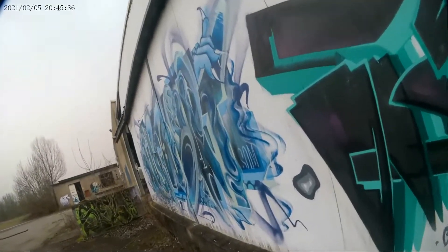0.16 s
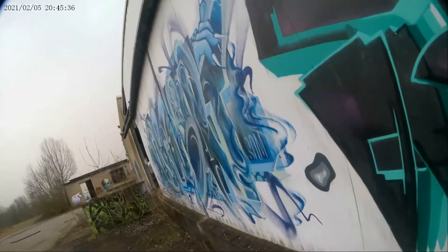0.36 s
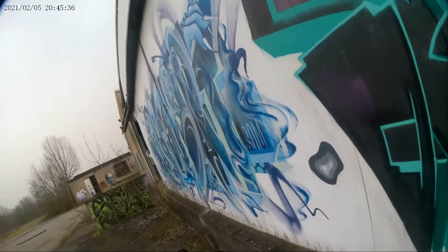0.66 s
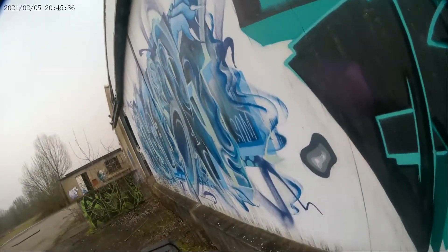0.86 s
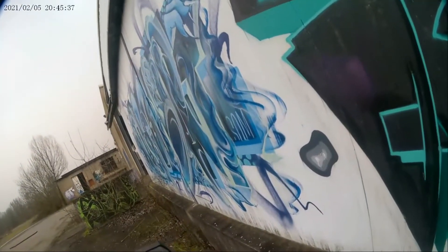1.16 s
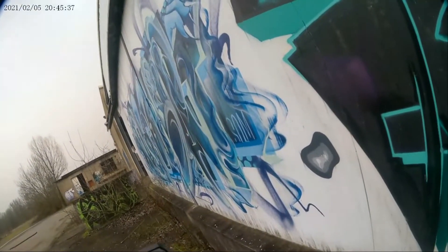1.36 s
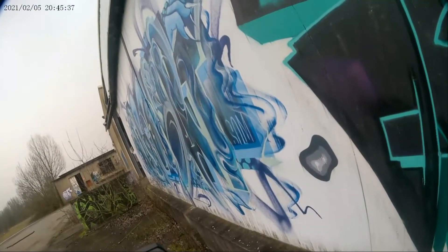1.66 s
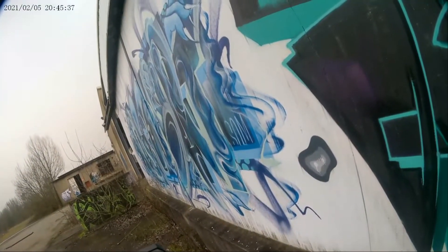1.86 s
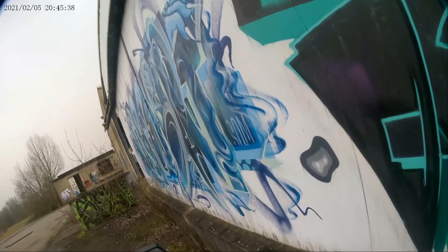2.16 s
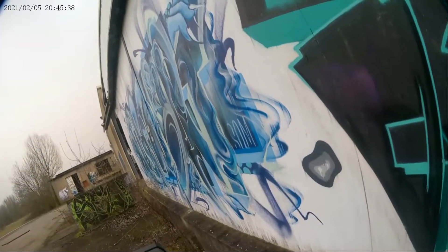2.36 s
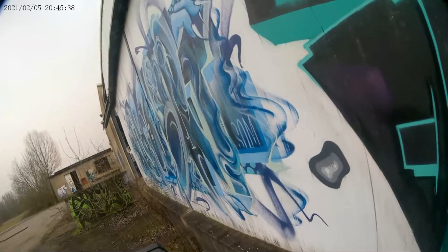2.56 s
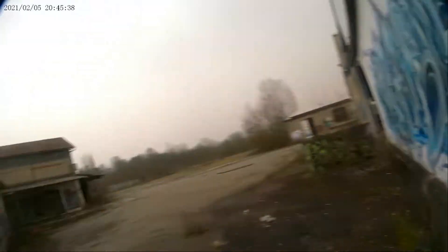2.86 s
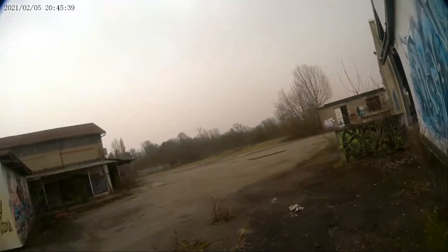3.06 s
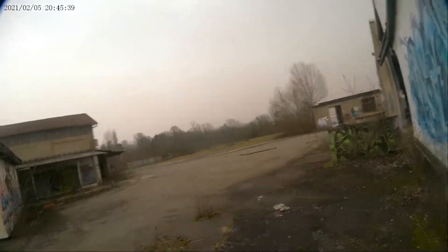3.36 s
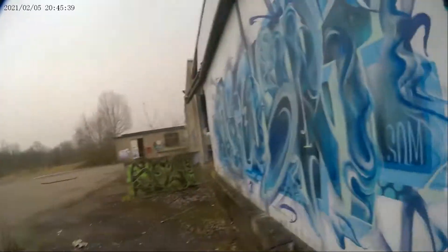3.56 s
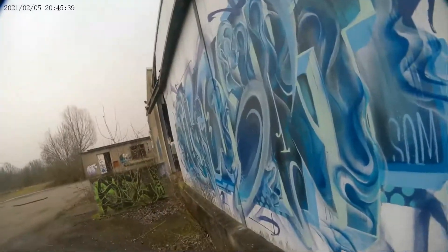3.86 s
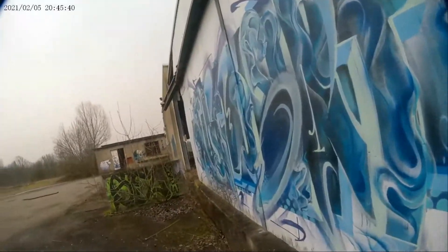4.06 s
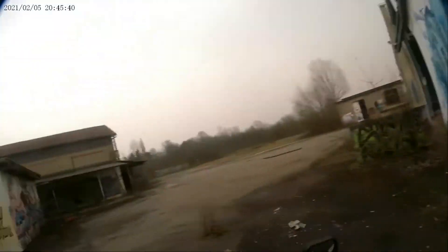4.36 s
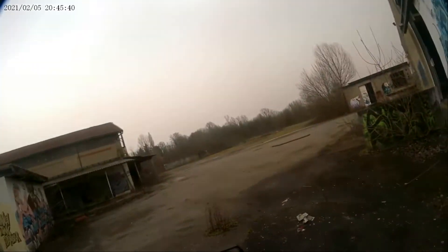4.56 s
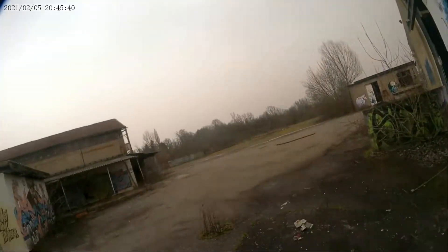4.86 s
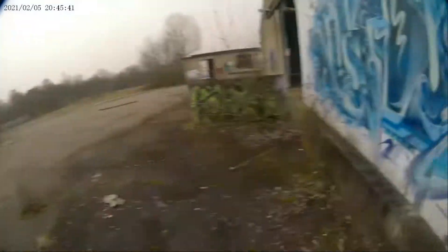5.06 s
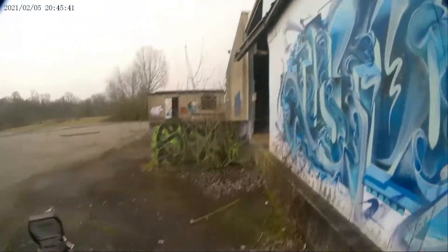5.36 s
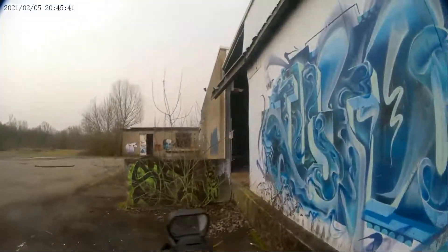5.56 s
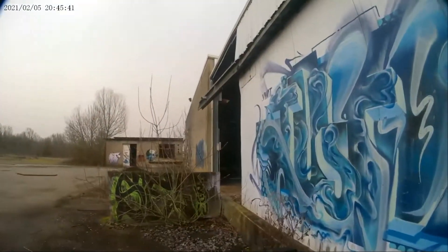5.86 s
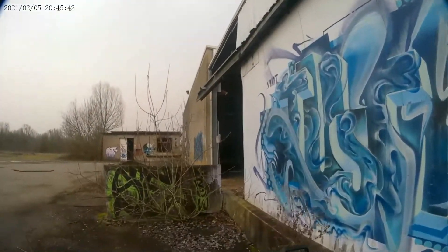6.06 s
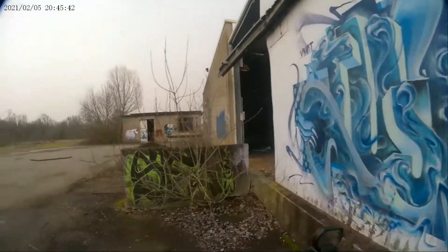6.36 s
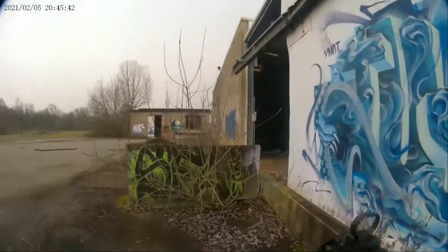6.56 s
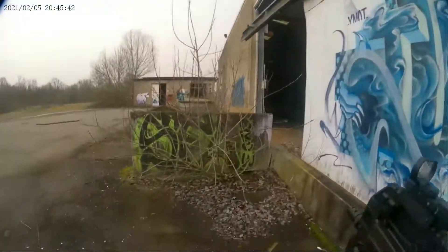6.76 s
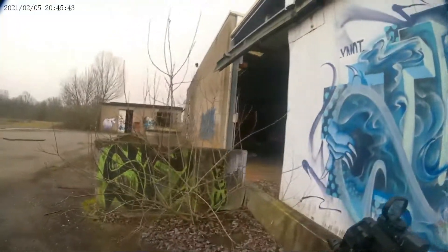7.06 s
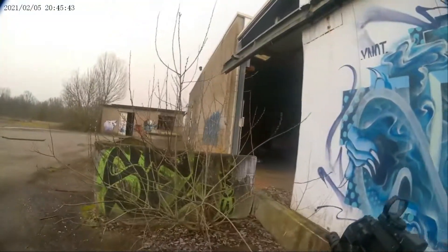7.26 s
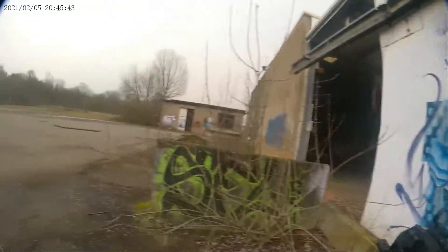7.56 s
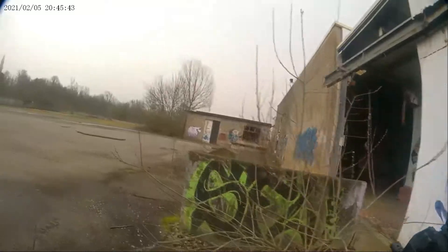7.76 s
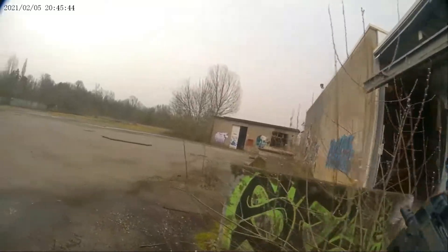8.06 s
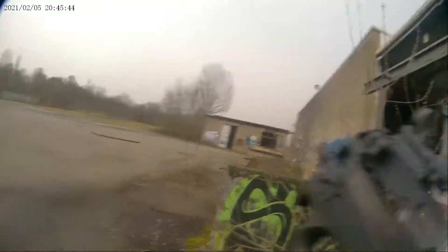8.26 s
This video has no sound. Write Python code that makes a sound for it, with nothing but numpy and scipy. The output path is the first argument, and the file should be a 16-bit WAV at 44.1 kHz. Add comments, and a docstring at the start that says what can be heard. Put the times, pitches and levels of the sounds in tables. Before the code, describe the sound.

Helmet camera outdoors: faint hiss and wind rumble, then irregular plastic knocks, clacks and rattles as the wearer moves over grit, with distant bird trills.

```python
"""A walker on gravel, heard through a small camera fixed to a helmet. From the start there is hiss with a thin
whine, a low wind rumble, and a rustle made of many tiny contacts. Soon jolts of the mount ring the plastic shell
as soft knocks, harder clacks and sharp ticks; swarms of tiny contacts make short rubs and rumbles, and lone stones
tick. Then far birds trill in short sliding notes, and the camera starts to slap in its seat: the seat rings and the
microphone is shoved. Later head swings stir up gusts of wind, and one low coo is heard among the trills."""
import sys
import numpy as np
from scipy import signal
from scipy.fft import rfft, irfft
from scipy.io import wavfile
from scipy.ndimage import uniform_filter1d

SR = 44100
rng = np.random.default_rng(int(sys.argv[2]) if len(sys.argv) > 2 else 0)


def master_out(mix):
    """Clip the mix to full scale and print it as 16-bit PCM to the path in sys.argv[1]."""
    frames = np.transpose(np.atleast_2d(mix))
    ceiling = np.clip(frames, -1, 1)
    pcm = np.round(ceiling * 32767).astype(np.int16)
    wavfile.write(sys.argv[1], SR, pcm)


def convert_level_to_amplitude(level_db):
    """Map a level in decibels to its linear amplitude factor."""
    exponent = np.asarray(level_db, float) / 20
    return 10 ** exponent


N = 370966  # samples in the scene
SPAN = 5000  # samples kept of each ringing contact

# Ways the plastic shell can ring: (f/Hz, relative strength/dB, time to fall 60 dB/s; 0.002 s at least is used)
SHELL = [(65.2, -29.5, 0.12), (130.5, 5.5, 0.028), (229.4, -1, 0.036), (370, -40.5, 0.011),
         (472, 19, 0.013), (550.5, 19, 0.044), (658.5, 6, 0.093), (748.2, 21, 0.035), (899, 22.5, 0.036),
         (1337, 29, 0.0076), (1443, 18.5, 0.0079), (1800, 15, 0.0072), (2320, 11, 0.028),
         (2990, 12.5, 0.002), (3520, -1.5, 0.0067), (3892, -8, 0.022), (5100, -2.5, 0.0069),
         (5510, 0, 0.0035), (7420, 10, 0.001), (8250, -11.5, 0.0071), (10540, -6.5, 0.0025),
         (12000, -4, 0.0046)]
# The mount strikes the helmet: (t/s, low knock level/dB, middle clack level/dB, high tick level/dB)
JOLTS = [(.148, -25, -31, -53), (.158, -30.5, -38, -68), (.1705, -31, -47, -50), (0.2319, -41, -33, -38),
         (0.2369, -41, -33.5, -43), (0.2942, -32, -32, -59), (0.385, -39, -39, -50),
         (0.4264, -46, -39, -49), (2.72, -30, -37, -48), (2.726, -37.5, -48, -65), (2.876, -31.5, -49, -53),
         (2.885, -38, -39, -51), (2.936, -16.5, -19.5, -30.5), (2.967, -36, -42, -59),
         (3.4008, -16, -17.5, -27), (3.42, -28.5, -52, -70), (3.4665, -26.5, -34, -65),
         (3.605, -7, -22, -22), (3.643, -26.5, -46, -48), (4.127, -44, -66, -68), (4.1738, -27.5, -31, -48),
         (4.376, -37, -46, -51), (4.389, -29.5, -38, -52), (4.423, -9, -13.5, -25.5),
         (4.5086, -39, -35.5, -62), (4.623, -26, -32, -47), (4.628, -32.5, -39, -60),
         (4.646, -54, -45, -63), (4.812, -38, -39.5, -68), (4.9681, -18.5, -15.5, -28.5),
         (5.055, -32, -46, -63), (5.111, -17, -20.5, -23), (5.151, -38, -42, -47), (5.23, -40, -50, -68),
         (5.287, -46, -49, -69), (5.355, -44, -55, -67), (5.458, -37, -40.5, -72), (5.581, -36, -36.5, -49),
         (5.6428, -36.5, -44, -69), (5.6755, -37.5, -49, -65), (5.716, -21, -22, -34),
         (5.737, -53, -38, -46), (6.298, -24, -35, -54), (6.321, -20.5, -24, -36), (6.351, -33, -34.5, -59),
         (6.5074, -32, -34, -52), (6.6324, -37, -51, -58), (6.6651, -27, -27, -66),
         (6.761, -20.5, -20, -30), (6.7955, -45, -44, -56), (6.853, -37, -55, -66),
         (6.884, -23.5, -20.5, -33), (6.89, -20.5, -35, -45), (7.008, -41.5, -46, -62),
         (7.4306, -34, -36.5, -56), (7.522, -25, -19.5, -44), (7.5475, -33, -45, -59),
         (7.6135, -20.5, -26, -42.5), (7.682, -43.5, -56, -67), (7.845, -32, -32, -45),
         (7.893, -35, -40, -55), (7.989, -34, -35.5, -54), (8.272, -38.5, -47, -61), (8.297, -37, -50, -54),
         (8.347, -40, -56, -62), (8.3886, -17.5, -28, -63)]
# The camera slaps in its seat, often just after a jolt:
# (t/s, shove level/dB, high tick level/dB, low knock level/dB, direction: 1 out, -1 in)
SLAPS = [(2.7974, -26, -21.5, -35.5, 1), (2.8006, -40, -29, -50, 1), (2.9464, -34, -37, -42, -1),
         (2.9523, -25, -30, -26, 1), (3.1248, -38, -39, -40.5, 1), (3.4081, -29.5, -33, -16, -1),
         (3.611, -14, -20, -7, -1), (3.6188, -28, -22, -22, 1), (3.625, -30, -42, -25, 1),
         (4.4387, -20, -47, -29, -1), (4.4416, -44, -28, -29, -1), (4.4573, -43, -46, -18, 1),
         (4.9748, -32.5, -38, -19, 1), (5.0653, -35.5, -40.5, -37, 1), (5.1146, -17, -26.5, -6, -1),
         (5.1247, -26, -27.5, -38, 1), (5.127, -44, -37, -37, -1), (5.7311, -25.5, -41, -27.5, -1),
         (6.1412, -29.5, -40.5, -31, -1), (6.236, -40.5, -39, -44, 1), (6.5254, -31, -41, -43, -1),
         (6.7718, -22, -40, -32, -1), (6.826, -52, -49, -46.5, 1), (6.8981, -26.5, -51, -37, -1),
         (6.94, -57, -50, -59, -1), (7.0531, -43.5, -42, -71, 1), (7.1829, -31.5, -41, -46, -1),
         (7.1925, -35.5, -54, -38, -1), (7.3156, -39, -39.5, -49, 1), (7.4483, -30.5, -44.5, -37, -1),
         (7.487, -52, -45.5, -42.5, 1), (7.536, -31, -65, -26.5, -1), (7.6272, -24.5, -39, -29, -1),
         (7.8583, -31.5, -45.5, -30.5, -1), (8.4062, -40, -37, -38.5, 1)]

SCATTER_DB = 2.2  # how much the mix of modes varies from one contact to the next
DAMP_S = 0.0023  # extra deadening of stone ticks, rubs and rumbles: time to fall to 1/e


def level(x, db):
    """Scale a sound to an rms level: the root of its mean power."""
    return x * convert_level_to_amplitude(db) / np.sqrt(np.mean(x ** 2))


def walk(per_s):
    """A wandering level: random values held 1 / per_s seconds, then smoothed twice."""
    hold = int(SR / per_s)
    steps = np.repeat(rng.standard_normal(N // hold + 1), hold)
    smooth = uniform_filter1d(uniform_filter1d(steps, hold), hold)
    return 1.3 * smooth[:N]


def arch(start, length):
    """A half-sine swell from 0 to 1 and back, zero elsewhere."""
    t = np.arange(N) / SR
    return np.sin(np.pi * np.clip((t - start) / length, 0, 1))


def rings(body, centre_hz, octaves, push_s, chatter_s, rough, scatter_db):
    """A body's ring after each contact, peak 1: a contact wakes the modes near its centre."""
    hz, db, t60 = np.array(body).T[:, :, None]
    t = np.arange(SPAN) / SR
    modes = np.sin(2 * np.pi * hz * t) * np.exp(-np.log(1000) * t / np.maximum(t60, 0.002))
    distance = np.log2(hz.T / np.reshape(centre_hz, (-1, 1))) / octaves
    # one set of random numbers per contact: first for its modes, then for its chatter
    chance = rng.standard_normal((len(distance), len(body) + 600))
    weight = convert_level_to_amplitude(db.T + scatter_db * chance[:, :len(body)]) * np.exp(-distance ** 2)
    weight = weight * (-1) ** np.arange(len(body))  # neighbouring modes start in opposite directions
    # a smooth push (longer = softer), roughened by a dying chatter of tiny contacts
    push = np.sin(np.pi * np.clip((t[:600] + 0.5 / SR) / push_s, 0, 1)) ** 2
    chatter = chance[:, len(body):] * np.exp(-t[:600] / chatter_s) / np.sqrt(2 * chatter_s / push_s)
    smooth_chatter = signal.fftconvolve(rough * chatter, push[None] / np.linalg.norm(push), axes=1)
    force = push + smooth_chatter[:, :600]
    out = signal.fftconvolve(weight @ modes, force, axes=1)[:, :SPAN]
    return out / np.abs(out).max(axis=1, keepdims=True)


def place(times, db, sounds):
    """Lay each sound down at its time and level."""
    out = np.zeros(N + SPAN)
    for start, gain, sound in zip((times * SR).astype(int), convert_level_to_amplitude(db), sounds):
        out[start:start + SPAN] += gain * sound
    return out[:N]


def trail(times, db, t60):
    """Power that jumps at each time and dies away, falling 60 dB in t60 seconds."""
    kicks = np.zeros(N)
    np.add.at(kicks, np.minimum((times * SR).astype(int), N - 1), convert_level_to_amplitude(2 * db))
    return signal.lfilter([1], [1, -convert_level_to_amplitude(-2 * 60 / (t60 * SR))], kicks)


def power_db(*powers):
    """Level of unrelated sounds together: their powers add."""
    return 10 * np.log10(sum(powers))


def all_knocks():
    """Times and levels of the low knocks: a little after each jolt, a little before each slap."""
    jolt, slap = np.transpose(JOLTS), np.transpose(SLAPS)
    times = np.r_[jolt[0] + 0.00154, slap[0] - 0.001]
    return times, np.r_[jolt[1], slap[3]]


def air():
    """Still air and microphone hiss: shaped noise with a faint, narrow electronic whine."""
    # Shape of the steady noise: (f/Hz, relative level per Hz/dB)
    air_shape = [(59, -37), (100, -26.5), (156, -23), (181, 1), (249, -1.5), (315, -8), (736, -10),
                 (1580, -23), (3940, -26), (10000, -28), (16000, -28)]
    whine_hz, whine_width_hz, whine_db = 9930, 70, 0  # whine level is against the hiss around it
    top_hz, air_db = 15900, -65
    hz = np.fft.rfftfreq(N, 1 / SR) + 1
    shape_hz, shape_db = np.transpose(air_shape)
    shape = convert_level_to_amplitude(np.interp(np.log(hz), np.log(shape_hz), shape_db))
    shape = shape * (1 + convert_level_to_amplitude(whine_db) * np.exp(-((hz - whine_hz) / whine_width_hz) ** 2))
    noise = irfft(rfft(rng.standard_normal(N)) * shape * (hz < top_hz), N)
    return level(noise, air_db)


def wind(effort_db):
    """Slow pressure swirls on the microphone port, stronger as the walker, mount and head move."""
    # The head swings through the air: (start t/s, length/s, level/dB)
    gusts = [(5.7, 0.095, -36), (4.5, 0.18, -46), (6.9, 0.35, -47), (7.75, .3, -47)]
    still_db, stir_db = -59, -2.5  # still wind; air stirred by moving, against the cloth
    sway_db, sway_growth, sway_t60_s = -25, 0.87, 0.42  # the mount sways through the air after a shove
    shove_s, shove_db = np.transpose(SLAPS)[:2]
    sway = trail(shove_s, sway_db + sway_growth * shove_db, sway_t60_s)
    swings = sum(convert_level_to_amplitude(2 * db) * arch(start, length) ** 2 for start, length, db in gusts)
    wind_db = power_db(convert_level_to_amplitude(2 * still_db), convert_level_to_amplitude(2 * (effort_db + stir_db)), sway, swings)
    band = signal.butter(2, [18, 90], "bandpass", fs=SR, output="sos")
    rumble = level(signal.sosfilt(band, rng.standard_normal(N)), 0)
    return rumble * convert_level_to_amplitude(wind_db + 0.28 * walk(12))


def rustle(effort_db, grit_db):
    """Dense small contacts: cloth rubs the low modes, grit the high ones."""
    shake_db, shake_growth, shake_t60_s = -34.5, 0.54, 0.15  # cloth keeps rustling after a knock
    knock_s, knock_db = all_knocks()
    shake = trail(knock_s, shake_db + shake_growth * knock_db, shake_t60_s)
    cloth_db = power_db(convert_level_to_amplitude(2 * effort_db), shake)
    # parts of each rub: (centre f/Hz, reach/octaves, level/dB)
    cloth_parts = ((195, 0.22, -29.0), (638, 0.17, 0.0), (1420, 0.34, -15.5))
    grit_parts = ((2100, 0.98, 4), (3900, 0.45, -6.0))
    out = 0
    for drive_db, per_s, flicker_db, parts in ((cloth_db, 1800, 2.5, cloth_parts),
                                               (effort_db + grit_db, 3000, 2.2, grit_parts)):
        hits = (rng.random(N) < per_s / SR) * rng.choice([-1, 1], N)
        hits = hits * convert_level_to_amplitude(2.2 * rng.exponential(size=N))  # a few hits are much stronger
        force = level(hits, 0) * convert_level_to_amplitude(drive_db + flicker_db * walk(35))
        for hz, octaves, db in parts:
            body = rings(SHELL, hz, octaves, 0.19 / hz, 0.001, 0, 0)[0]
            # constant rubbing damps the shell, so its rings are shorter
            body = body * np.exp(-np.arange(SPAN) / SR / 0.003)
            out = out + signal.fftconvolve(force, body * convert_level_to_amplitude(db) / np.linalg.norm(body))[:N]
    return out


def knocks():
    """Soft contacts of jolts and slaps push slowly, so they ring the low shell modes."""
    times, peak_db = all_knocks()
    return place(times, peak_db, rings(SHELL, 0 * times + 607, 0.37, 0.00049, 0.0046, 0.94, SCATTER_DB))


def clacks():
    """Harder contacts of jolts and slaps push faster, so they reach the middle shell modes."""
    jolt, slap = np.transpose(JOLTS), np.transpose(SLAPS)
    times = np.r_[jolt[0], slap[0]]
    peak_db = np.r_[jolt[2], slap[3] - 9]  # a slap's clack is 9 dB below its knock
    # a contact with more clack than knock is harder and rings higher: 0.015 octaves per dB
    hz = 1674 * 2 ** (0.015 * (peak_db - all_knocks()[1]))
    return place(times, peak_db, rings(SHELL, hz, 0.71, 0.00026, 0.0045, 1.0, SCATTER_DB))


def jolt_ticks():
    """Sharp little contacts in the jolts push very briefly, so they reach the high shell modes."""
    times, _, _, peak_db = np.transpose(JOLTS)
    return place(times, peak_db, rings(SHELL, 0 * times + 3900, 0.42, 0.00014, 0.002, 1.1, SCATTER_DB))


def rubs_and_rumbles():
    """Swelling swarms of tiny contacts, from a low rumble at 140 Hz to bright gritty brushes."""
    # Short rubs and rumbles: (start t/s, length/s, centre f/Hz, level/dB)
    swells = [(0.321, 0.032, 2100, -54.5), (0.255, 0.094, 4800, -65), (0.402, 0.1, 3900, -66),
              (0.432, 0.075, 2100, -55.5), (0.525, 0.056, 2100, -57), (0.667, 0.026, 1940, -57),
              (0.796, 0.055, 1800, -53.5), (4.198, 0.15, 3520, -56.5), (4.24, 0.15, 2020, -60.5),
              (6.309, 0.059, 600, -41.5), (6.328, .06, 5270, -64), (4.997, 0.13, 140, -46),
              (5.075, 0.047, 610, -40.5), (8.255, 0.11, 606, -51.5), (8.267, 0.074, 1270, -56)]
    damp = np.exp(-np.arange(SPAN) / SR / DAMP_S)
    hits = (rng.random(N) < 900 / SR) * rng.choice([-1, 1], N)
    swarm = level(hits * convert_level_to_amplitude(1.24 * rng.exponential(size=N)), 0)
    out = 0
    for start, length, hz, db in swells:
        body = rings(SHELL, hz, 0.49, 0.39 / hz, 0.001, 0, 0)[0] * damp
        swelling = swarm * arch(start, length)
        out = out + signal.oaconvolve(swelling, body * convert_level_to_amplitude(db) / np.linalg.norm(body))[:N]
    return out


def stone_ticks():
    """Lone stones wake the high shell modes roughly, and loose grit deadens the rings it starts."""
    # Lone stones: (t/s, peak level before the grit deadens it/dB)
    stones = [(.2722, -40), (0.283, -44), (0.3026, -48), (0.368, -45), (3.483, -47), (3.801, -49),
              (4.184, -38), (4.2192, -35), (4.229, -32), (4.237, -38), (4.2576, -43), (4.2683, -33.5),
              (4.2834, -34), (4.3185, -37), (4.5878, -40), (6.571, -50), (7.741, -45.5)]
    times, peak_db = np.transpose(stones)
    damp = np.exp(-np.arange(SPAN) / SR / DAMP_S)
    ticks = rings(SHELL, 0 * times + 4000, 0.33, 0.0001, 0.0019, 2.5, SCATTER_DB)
    return place(times, peak_db, ticks * damp)


def birds():
    """Thin trills of short falling notes, and one low coo, all wavering in level and pitch."""
    # Far trills: (start t/s, length/s, middle f/Hz, level before wavering/dB)
    trills = [(1.272, .11, 3600, -72.5), (3.804, 0.31, 4700, -77.5), (4.873, 0.18, 4800, -71),
              (5.292, 0.23, 4760, -73.5), (5.738, 0.22, 4740, -73), (6.0, .07, 3500, -78),
              (6.203, .081, 4700, -73), (6.466, .06, 4650, -77)]
    notes_per_s, fall_share = 12, 0.022  # each note falls by this share of its pitch
    t, waver = np.arange(N) / SR, walk(21)

    def sing(start, length, db, hz):
        """One wavering tone, with quick but smooth edges."""
        tone = np.sin(2 * np.pi * np.cumsum(hz * (1 + 0.0024 * waver)) / SR)
        return convert_level_to_amplitude(db + waver) * arch(start, length) ** 0.17 * tone

    out = sing(5.85, 0.32, -61, 472)  # the coo
    for start, length, hz, db in trills:
        note = ((t - start) * notes_per_s) % 1  # place within the note, 0 to 1
        falling_hz = hz * (1 + fall_share * (0.5 - note))
        out = out + np.sin(np.pi * note) ** 0.5 * sing(start, length, db, falling_hz)
    return out


def slap_shoves():
    """Slaps shove the mount with a low thud and jerk the microphone capsule in or out."""
    slap_s, shove_db, _, _, way = np.transpose(SLAPS)
    jerk_in_hz, jerk_out_hz, jerk_t60_s = 590, 330, 0.0044
    jerk_gain_db, thud_db, lead_s = 5.5, -6.5, 0.0003  # gains against the shove; it starts before the slap
    t = np.arange(SPAN) / SR
    jerk_hz = np.where(way > 0, jerk_out_hz, jerk_in_hz)[:, None]
    jerk = np.sin(2 * np.pi * jerk_hz * t) * convert_level_to_amplitude(-60 * t / jerk_t60_s)
    jerk = convert_level_to_amplitude(jerk_gain_db) * np.sign(way)[:, None] * jerk / jerk.max(axis=1, keepdims=True)
    jerk = signal.lfilter(*signal.butter(1, 60, "high", fs=SR), jerk)  # the port leaks slow pressure
    thud = convert_level_to_amplitude(thud_db) * rings(SHELL, 0 * slap_s + 170, 0.48, 0.00081, 0.0009, 0.41, SCATTER_DB)
    return place(slap_s - lead_s, shove_db, jerk + thud)


def slap_ticks():
    """Slaps ring the seat with very short, rough contacts and snap above that ring."""
    # Ways the seat can ring: (f/Hz, relative strength/dB, time to fall 60 dB/s)
    seat = [(1700, -14, .006), (3337, -6, 0.0077), (4440, -14.5, .005), (5100, -12.5, 0.0068),
            (6800, -5.5, 0.0033), (8520, -2.5, 0.0059), (9700, -2, 0.0085), (10800, 6.5, 0.0064),
            (12600, -0.5, 0.0046), (13900, -3, .004)]
    times, _, tick_db, _, way = np.transpose(SLAPS)
    # the snap grows faster than the tick, and outward slaps are brighter
    snap_db = -5 + 1.54 * tick_db + 4 * (way > 0)
    snap = rings(seat, 0 * times + 10000, 0.49, 0.00003, 0.0011, 1.5, SCATTER_DB)
    tick = rings(seat, 0 * times + 4600, 0.48, 0.00003, 0.0027, 1.9, SCATTER_DB)
    return place(times, snap_db, snap) + place(times, tick_db, tick)


def scene():
    """Everything reaches one microphone inside the shell, so the sounds simply add."""
    # How much the walker moves: (t/s, drive of the cloth rustle/dB, grit against the cloth/dB)
    effort = [(0.0, -60, -9.5), (0.3, -53.5, -11.5), (1.33, -69.5, -11), (2.41, -70, -11.5),
              (2.9, -57.5, -12), (3.65, -55.5, -11), (3.98, -58, -9.5), (4.45, -51.5, -11),
              (4.82, -58, -10), (5.08, -55.5, -8.5), (5.79, -64.5, -12), (6.23, -58.5, -13.5),
              (6.53, -65, -14.5), (6.82, -56.5, -14), (7.28, -66, -8), (7.57, -60.5, -11.5),
              (8.25, -63, -12), (8.41, -51, -14.5)]
    t = np.arange(N) / SR
    effort_s, effort_db, grit_db = np.transpose(effort)
    effort_db, grit_db = np.interp(t, effort_s, effort_db), np.interp(t, effort_s, grit_db)
    background = air() + wind(effort_db) + birds()
    jolts_and_slaps = knocks() + clacks() + jolt_ticks() + slap_shoves() + slap_ticks()
    small_contacts = rustle(effort_db, grit_db) + rubs_and_rumbles() + stone_ticks()
    return (background + jolts_and_slaps + small_contacts)[None]


def top_cut(x):
    """Nothing passes above the cut-off."""
    return signal.sosfilt(signal.butter(12, 16640, fs=SR, output="sos"), x)


def record(dry):
    """The converter adds a small steady offset."""
    mix = dry + 0.0027
    return top_cut(mix)


dry = scene()
out = record(dry)
master_out(out)
```